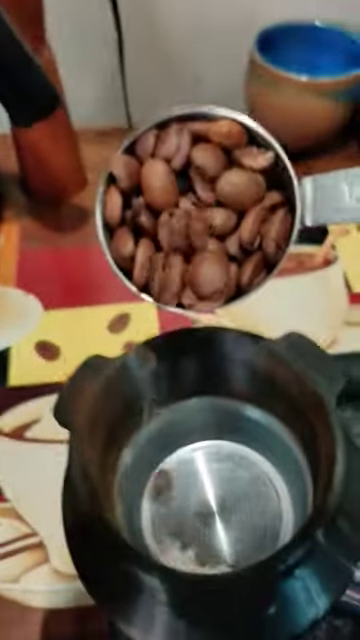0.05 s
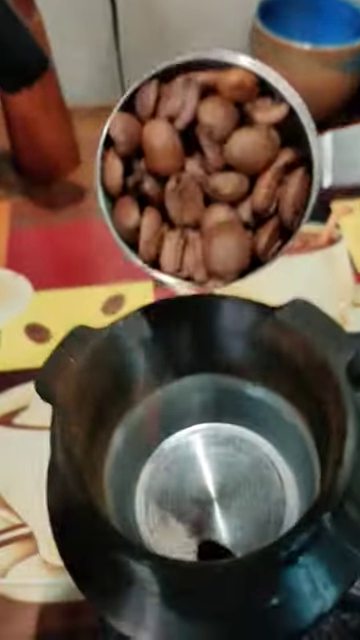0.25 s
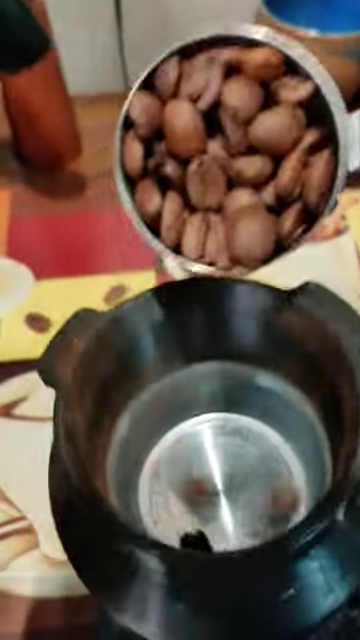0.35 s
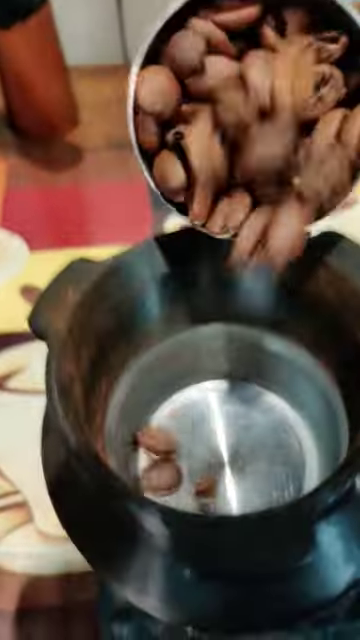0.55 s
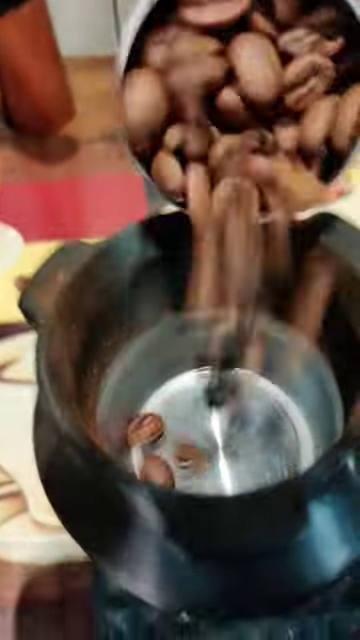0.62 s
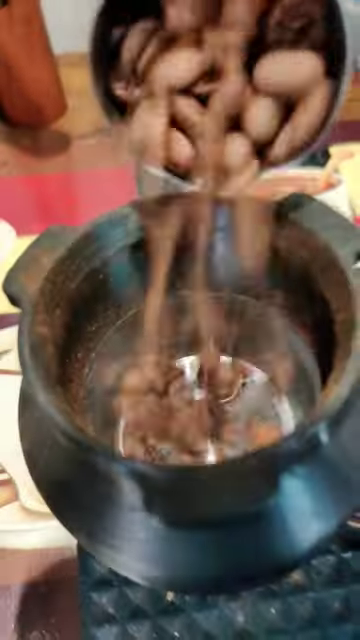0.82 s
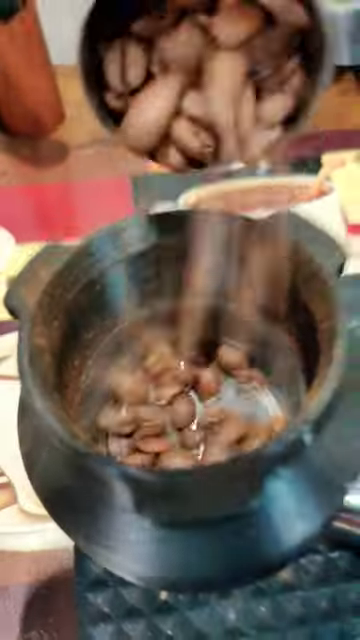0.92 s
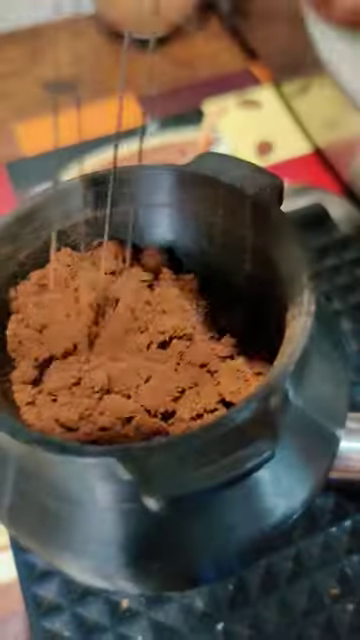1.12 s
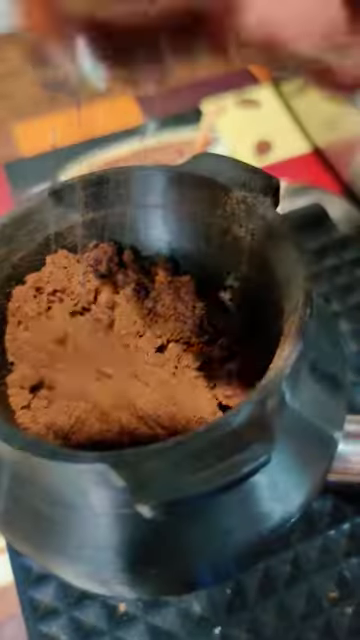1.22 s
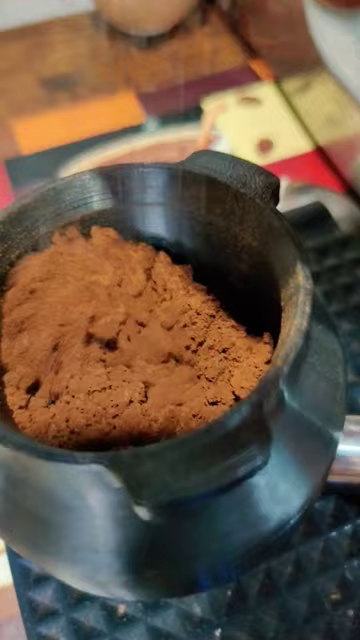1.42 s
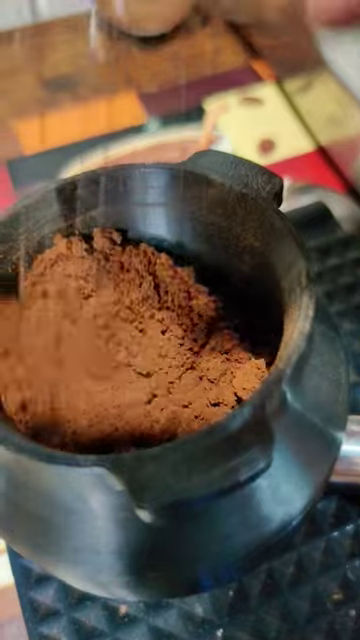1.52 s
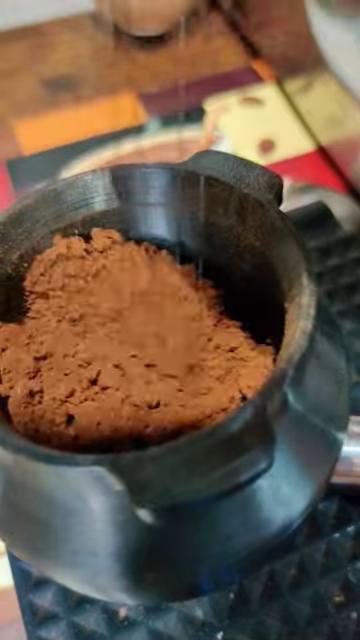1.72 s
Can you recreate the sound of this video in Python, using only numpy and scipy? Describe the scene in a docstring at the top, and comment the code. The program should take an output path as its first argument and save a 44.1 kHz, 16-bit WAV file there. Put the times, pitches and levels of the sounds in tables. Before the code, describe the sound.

Coffee beans tipped from a scoop clink on bare steel, then rattle densely as they pile up in the cup. The close pour stops suddenly, leaving a quiet kitchen's electrical hum and a tiny, faint squeak.

```python
"""In a quiet kitchen, coffee beans are tipped from a scoop into a grinder's steel cup.
The first beans knock the scoop and clink on the bare floor of the cup, making the steel ring.
Then the rest pour in, rattle on the heap and damp much of that ring. The sound breaks off
for a moment; later a brief rub makes one faint squeak. Mains hum and soft room air lie under it all."""
import sys
import numpy as np
from scipy import signal
from scipy.fft import rfft, irfft
from scipy.io import wavfile
from scipy.ndimage import uniform_filter1d, minimum_filter1d

SR = 44100
rng = np.random.default_rng(int(sys.argv[2]) if len(sys.argv) > 2 else 0)


def master(y):
    """Save y as 16-bit WAV."""
    cut = np.clip(np.atleast_2d(y).T, -1, 1)
    pcm = np.round(cut * 32767)  # scale
    wavfile.write(sys.argv[1], SR, pcm.astype(np.int16))


N = 77175

# Levels are relative. Balance is left minus right; lead is how far the left wave runs ahead.
# tone of the room air: (frequency [Hz], level [dB])
AIR_COLOUR = [(20, 2.5), (60, 2), (100, 4.5), (170, 1), (215, -8), (280, -3), (400, -13), (700, -18.5),
              (1150, -23.5), (1500, -34), (2000, -38), (3000, -35), (5000, -26), (6500, -31.5),
              (7900, -43.5), (8150, -70.5)]
# how alike the air is in both ears: (frequency [Hz], likeness [-1 to 1])
AIR_ALIKE = [(250, 0.93), (500, 0.65), (1020, -0.2), (2060, 0.27), (4180, -0.1)]
# which side the air is louder on: (frequency [Hz], balance [dB])
AIR_BALANCE = [(100, -1.5), (500, -2), (1600, -1), (5000, -5), (8000, 9)]
# mains hum and faint steady tones: (frequency [Hz], level [dB])
HUM_TONES = [(120, -31), (274, -61.5), (301, -63.5), (1185, -75.5), (4810, -69.5)]
# loudness of hum and air, which dips while the beans fall: (time [s], level [dB])
BACKGROUND_LEVEL = [(0, -2), (.205, 0), (.235, -7), (.39, -3.5), (.46, -8), (.52, -9), (.57, -3.5),
                    (.79, -1), (.812, -14.5), (1.08, -15), (1.115, -1), (1.75, -1.5)]
# beans hitting the cup; where one lands sets the upper note's share of the low ring:
# (time [s], clack [dB], low ring [dB], high ring [dB], share [0 to 1])
BEAN_HITS = [(0.2205, -14, -38.5, -37.5, 0.85), (0.2228, -8, -8.5, -7.5, 1), (0.3098, -10, -5, -15, 0.18),
             (0.3795, -8, -13.5, -20.5, 0), (0.3997, -18, -29.5, -17.5, 0.87),
             (0.4153, -17, -19, -15, 0.59), (0.4295, -13.5, -5, -5.5, 0.73),
             (0.4515, -13.5, -22, -12.5, 0.89), (0.455, -12.5, -16.5, -10.5, 0.85),
             (0.4662, -20.5, -19.5, -29.5, 0.78), (0.489, -34.5, -11, -17.5, 0.29),
             (0.4996, -17.5, -15, -18, 0.92), (0.5093, -16, -8.5, -11, 1), (0.5449, -11.5, -7, -23.5, 0),
             (0.5494, -17, -13.5, -48, 0.03), (0.559, -9.5, -3, -28.5, 0), (0.5993, -11.5, -3, -18.5, 0.1),
             (0.626, -19, -27.5, -34, 0.6), (0.6475, -25, -31.5, -37, 0.5), (0.6607, -21, -8, -29, 0.96),
             (0.6794, -19, -10.5, -28, 0.86), (0.7322, -19.5, -33, -39, 0.44),
             (0.739, -23, -14.5, -32, 0.02), (0.7875, -21, -18.5, -35.5, 0.38), (0.8102, -3, 4, -17, 1),
             (0.8143, -11.5, -0.5, -29.5, 1), (0.8268, -15.5, 1.5, -41.5, 0.93),
             (0.851, -13, -2.5, -21.5, 0.78), (0.862, -18.5, 0, -30, 1), (0.8685, -11.5, -12, -26, 0.8),
             (0.875, -11.5, -26, -28, 0.7), (0.8805, -20.5, -8.5, -20, 0.5), (0.8998, -29.5, -3.5, -31, 1),
             (0.9278, -6, -14, -27, 0.09), (0.933, -18, -8, -26, 0.7), (0.951, -12.5, -24, -22.5, 1),
             (0.955, -16.5, 0.5, -33.5, 0.9), (0.9768, -6, 2, -21, 1), (0.9892, -23, -8, -28, 0.37),
             (0.993, -13.5, -15, -29.5, 0.73), (1.003, -15, -18, -29, 0.8), (1.0112, -16.5, -15, -43, 0.9),
             (1.018, -20.5, -22, -35, 0.4), (1.031, -7, 0, -16.5, 0.54), (1.0565, -16, -5.5, -43.5, 1),
             (1.063, -18.5, -7.5, -32, 1)]
# small bounces between the hits: (time [s], level [dB])
BOUNCE_LEVEL = [(.38, -32), (.5, -28), (0.65, -24), (.78, -23), (0.798, -48.5), (0.858, -18.5), (1.0, -15),
                (1.081, -18.5)]
# tone of a clack: (frequency [Hz], level on bare steel [dB], level on the heap [dB])
CLACK_COLOUR = [(1010, -28, -31), (2050, -29.5, -35.5), (2275, -14.5, -17), (2520, -7, -17),
                (2812, -11.5, -23.5), (3230, -8, -5), (3970, -3, -5.5), (3990, -4.5, 5), (4600, 7, -9),
                (5660, -0.5, 6), (6200, -2.5, -5.5), (7040, -4.5, -9), (7240, -3.5, -7.5), (8600, -40, -46),
                (9300, -48, -59)]
# how a clack reaches left and right: (frequency [Hz], balance [dB], lead [rad])
CLACK_STEREO = [(2800, -3, 4.1), (3690, -9.5, 1.9), (3800, 2.5, 0.17), (5100, -21, 0.26), (5400, 3.5, 0.6),
                (6700, -6.5, 0.57), (7700, -1.5, 0.44)]
# the cup floor's notes, a close low pair and then a close high pair: (frequency [Hz])
FLOOR_HZ = (5156, 5261, 7084, 7164)
# how each of them rings; a fade is the time it takes to drop by 60 dB:
# (level [dB], bare fade [s], fade under beans [s], balance [dB], lead [rad])
FLOOR_RINGS = [(-1.5, 0.12, 0.04, -8.5, -2), (-4.5, 0.12, 0.064, 5.5, -2), (-2, 0.14, 0.17, 6.5, 2.6),
               (-9.5, 0.15, 0.19, 9, -1.5)]
# the cup's weaker notes:
# (frequency [Hz], level [dB], bare fade [s], fade under beans [s], balance [dB], lead [rad])
WALL_NOTES = [(2805, -21.5, 0.061, 0.0022, -7, -2), (4193, -6, 0.015, 0.012, -22, 5.5),
              (4410, -12.5, 0.02, 0.032, -8, 1.5), (5350, -8.5, 0.021, 0.05, 7.5, 4.5),
              (5700, -11, .02, 0.055, -2, -1.5), (5877, -5, 0.013, 0.018, 8, 3.5),
              (6650, -24.5, 0.037, 0.024, 12.5, 7.5), (7845, -19.5, 0.057, 0.015, -1.5, 1.5)]
# beans knocking the scoop: (time [s], low note [dB], high note [dB])
SCOOP_KNOCKS = [(.3795, -29.5, -25.5), (.4996, -26.5, -29.5), (.5494, -28.5, -22), (.5834, -29.5, -39.5),
                (.6607, -27, -30.5), (.627, -31, -20), (.7, -24, -22), (.7322, -28.5, -19.5),
                (.7634, -44.5, -22)]
# the scoop's notes:
# (frequency [Hz], level [dB], early fade [s], late fade [s], balance [dB], lead [rad])
SCOOP_NOTES = [(3622, -4.5, .18, .04, -8, 2.3), (4470, 1.5, .08, .03, -20, .1)]
# loudness of the squeak: (time [s], level [dB])
SQUEAK_LEVEL = [(1.627, -66.5), (1.6285, -51), (1.642, -51.5), (1.652, -44), (1.658, -46), (1.67, -47),
                (1.679, -55), (1.686, -71)]
# the squeak's notes: (frequency [Hz], width [Hz], level [dB])
SQUEAK_NOTES = [(4150, 41.5, 8.5), (6100, 150, 7.5)]
# tone of the scrape: (frequency [Hz], level [dB])
SCRAPE_TONE = [(2000, -22), (3800, 0), (7600, -6), (8500, -49)]

HEAP_S = .805  # from here on, beans cover the cup floor
BREAK_START_S, BREAK_END_S, BREAK_FADE_S = 1.085, 1.113, .013
TIME = np.arange(N) / SR


def amp(db):
    """Turns decibels into a number to multiply by."""
    return 10 ** (np.asarray(db) / 20)


def unit(x):
    """Scales a signal to an average power of 1."""
    return x / np.sqrt(np.mean(abs(x) ** 2) + 1e-20)


def over_time(points):
    """Joins a table's points into a curve over time."""
    return np.interp(TIME, *np.transpose(points))


def over_hz(points, column=1):
    """Joins one column's points into a curve over frequency."""
    rows = np.array(points)
    return np.interp(np.log(np.fft.rfftfreq(N, 1 / SR) + 1), np.log(rows[:, 0]), rows[:, column])


def stereo(balance_db, lead):
    """Left and right gains that make one side louder and shift its wave ahead."""
    left = amp(balance_db / 2) * np.exp(1j * lead / 2)
    pair = np.array([left, 1 / left]).reshape(2, -1)
    return pair / np.sqrt(np.mean(abs(pair) ** 2, axis=0))


def causal(gain):
    """Makes a filter ring only after a click, never before it."""
    mirrored = np.log(np.concatenate([gain, gain[:0:-1]]))
    return np.exp(np.conj(signal.hilbert(mirrored)))[:len(gain)]


def noise_pair(envelope, likeness):
    """Spectra of two partly alike noises that swell and fade together."""
    left, other = rfft(rng.standard_normal((2, N)) * envelope)
    return np.array([left, likeness * left + np.sqrt(1 - likeness ** 2) * other])


def kicks(times, sizes):
    """One sharp spike for each hit."""
    return np.bincount(np.round(times * SR).astype(int), sizes, N)[:N]


def room_air():
    """The room's air is a soft, low rush of noise."""
    spectrum = noise_pair(1, over_hz(AIR_ALIKE)) * amp(over_hz(AIR_COLOUR))
    return amp(-39) * unit(irfft(spectrum * stereo(over_hz(AIR_BALANCE), 0), N))


def mains_hum():
    """The mains hum and a faint whine hold their pitch while their loudness wavers."""
    waver = unit(sum(np.sin(2 * np.pi * (hz * TIME + rng.random())) for hz in np.geomspace(1, 14, 12)))
    hum = sum(amp(db) * np.exp(2j * np.pi * (hz * TIME + rng.random())) for hz, db in HUM_TONES)
    return np.sqrt(2) * (stereo(balance_db=-4.4, lead=.35) * hum).real * amp(.7 * waver)


def small_bounces():
    """Beans bounce at random, more often on the heap; gives rows like BEAN_HITS."""
    tries, bare_per_s, heap_per_s = 400, 70, 130
    when, level = np.transpose(BOUNCE_LEVEL)
    moment, size, spot, chance = rng.random((tries, 4)).T
    span = when[-1] - when[0]
    times = when[0] + moment * span
    db = np.interp(times, when, level) + .25 * np.log(size / (1 - size))
    share = np.where(times < HEAP_S, spot, 1)  # on the heap, the low pair's upper note takes it all
    rate = np.where(times < HEAP_S, bare_per_s, heap_per_s)
    rows = np.column_stack([times, db, db + 5.5, db - 11, share])
    return rows[chance < rate * span / tries]


def steel_note(times, sizes, hz, db, bare_fade_s, heap_fade_s, balance_db, lead):
    """Struck steel rings at one pitch; its fade time changes once the heap forms."""
    rise_s, heap_start = .0012, round(HEAP_S * SR)
    turn = np.exp(2j * np.pi * hz / SR)
    rise = np.exp(-1 / (rise_s * SR))
    push = signal.lfilter([1 - rise], [1, -rise * turn], kicks(times, sizes) + 1e-18)
    # each sample, the wave turns a little further and shrinks a little
    bare_step, heap_step = turn * amp(-60 / (np.array([bare_fade_s, heap_fade_s]) * SR))
    bare = signal.lfilter([1], [1, -bare_step], push[:heap_start])
    heap = signal.lfilter([1], [1, -heap_step], push[heap_start:], zi=[bare[-1] * heap_step])[0]
    return amp(db) * (stereo(balance_db, lead) * np.concatenate([bare, heap])).imag


def cup_ring(hits):
    """Each bean rings the cup's floor and wall; where it lands sets the mix of the two low notes."""
    times, clack_db, low_db, high_db, share = hits.T
    sizes = [amp(low_db) * np.sqrt(1 - share), amp(low_db) * np.sqrt(share), amp(high_db), amp(high_db)]
    floor = sum(steel_note(times, size, hz, *ring)
                for size, hz, ring in zip(sizes, FLOOR_HZ, FLOOR_RINGS))
    wall = sum(steel_note(times, amp(clack_db) * rng.uniform(.3, 1.7, len(times)), *note)
               for note in WALL_NOTES)
    return floor + wall


def clacks(hits, colour_db):
    """Each bean gives a dry tick, which the hollow of the cup colours and briefly draws out."""
    rise_s, tick_fade_s, hollow_fade_s = .0003, .0065, .024
    times, db = hits[:, :2].T
    t = TIME[:SR // 10]
    burst = (1 - np.exp(-t / rise_s)) * (amp(-60 * t / tick_fade_s) + amp(-10 - 60 * t / hollow_fade_s))
    power = signal.fftconvolve(kicks(times, amp(db) ** 2), burst ** 2)[:N]
    ticks = noise_pair(np.sqrt(abs(power)), likeness=.84)
    sides = stereo(over_hz(CLACK_STEREO), over_hz(CLACK_STEREO, column=2))
    return irfft(ticks * causal(unit(amp(colour_db))) * sides, N)


def kitchen_echo(sound):
    """The kitchen throws back a short wash of sound, different in each ear."""
    t, fade_s = TIME[:SR // 2], .16
    tail = rng.standard_normal((2, len(t))) * amp(-60 * t / fade_s) * (t > .004)
    tail /= np.linalg.norm(tail, axis=1, keepdims=True)
    return amp(-14) * signal.fftconvolve(sound, tail, axes=1)[:, :N]


def scoop_ring():
    """Beans knock the steel scoop as they slide off, ringing its two notes."""
    times, *levels = np.transpose(SCOOP_KNOCKS)
    return sum(steel_note(times, amp(db), *note) for db, note in zip(levels, SCOOP_NOTES))


def squeak():
    """A brief rub sings two fluttering high notes."""
    flutter_db, tones = 3, 0
    rubbing = (TIME > SQUEAK_LEVEL[0][0]) & (TIME < SQUEAK_LEVEL[-1][0])
    for hz, width, db in SQUEAK_NOTES:
        drift = np.cumsum(rng.standard_normal(N)) * np.sqrt(2 * np.pi * width / SR)  # blurs the pitch
        flutter = amp(flutter_db * unit(uniform_filter1d(rng.standard_normal(N), size=150)))
        tone = flutter * np.exp(1j * (2 * np.pi * hz * TIME + uniform_filter1d(drift, size=30)))
        tones += amp(db) * (stereo(balance_db=-2, lead=1.72) * tone).real
    return amp(over_time(SQUEAK_LEVEL)) * rubbing * tones


def scrape():
    """The rub ends in a tiny swell of scratchy noise."""
    peak_s, width_s = 1.669, .011
    friction = unit(irfft(noise_pair(1, likeness=.4) * amp(over_hz(SCRAPE_TONE)), N))
    return amp(-47) * friction * np.exp(-((TIME - peak_s) / width_s) ** 2)


def scene():
    """The pour, which ends at the break, and the later squeak, over hum and room air."""
    hits = np.vstack([BEAN_HITS, small_bounces()])
    on_bare = hits[:, 0] < HEAP_S
    steel_band = signal.butter(4, [2400, 8200], "bandpass", fs=SR, output="sos")
    pour = signal.sosfilt(steel_band, cup_ring(hits) + scoop_ring())
    pour += clacks(hits[on_bare], over_hz(CLACK_COLOUR, column=1))
    pour += clacks(hits[~on_bare], over_hz(CLACK_COLOUR, column=2))
    rub = squeak() + scrape()
    pour = (pour + kitchen_echo(pour)) * (TIME < BREAK_START_S)
    rub = rub + kitchen_echo(rub) / 2
    background = (room_air() + mains_hum()) * amp(over_time(BACKGROUND_LEVEL))
    return pour + rub + background


def record(dry):
    """A limiter holds down peaks, the sound breaks off briefly, and the highest treble is cut."""
    ceiling, top_hz = .95, 9070
    safe_gain = ceiling / np.maximum(abs(dry).max(axis=0), ceiling)
    limited = dry * uniform_filter1d(minimum_filter1d(safe_gain, size=129), size=129)
    outside_break_s = np.maximum(BREAK_START_S - TIME, TIME - BREAK_END_S)
    fade = np.clip(outside_break_s / BREAK_FADE_S, 0, 1)
    gate = np.maximum(np.sin(np.pi / 2 * fade) ** 2, amp(-34))
    treble_cut = signal.firwin(255, top_hz, window=("kaiser", 8), fs=SR)
    return signal.oaconvolve(limited * gate, treble_cut[None], "same")


dry = scene()
out = record(dry)
master(out)
```